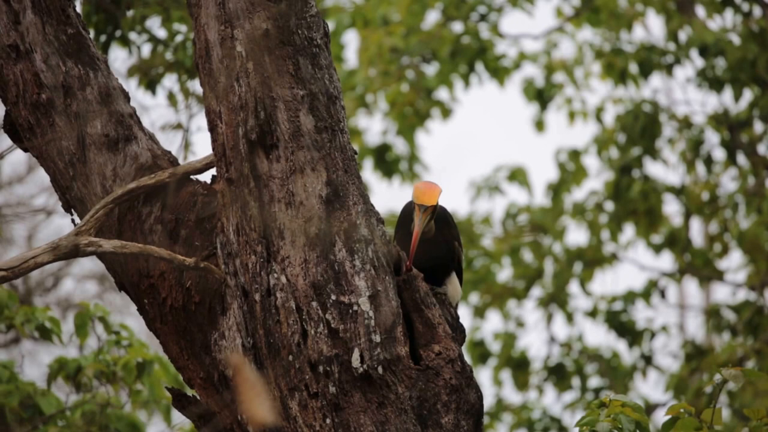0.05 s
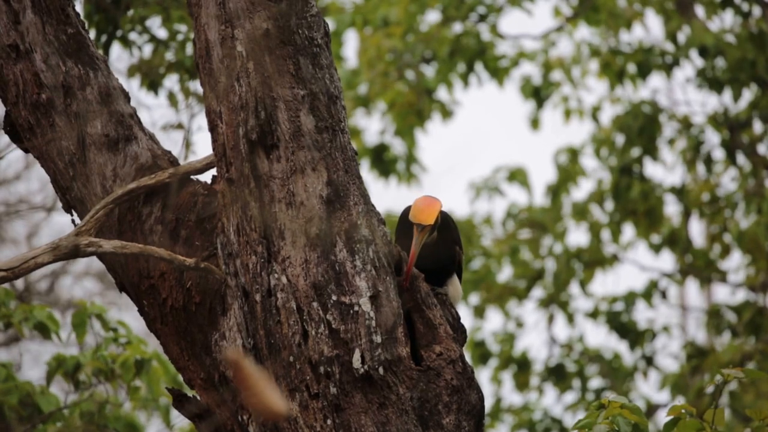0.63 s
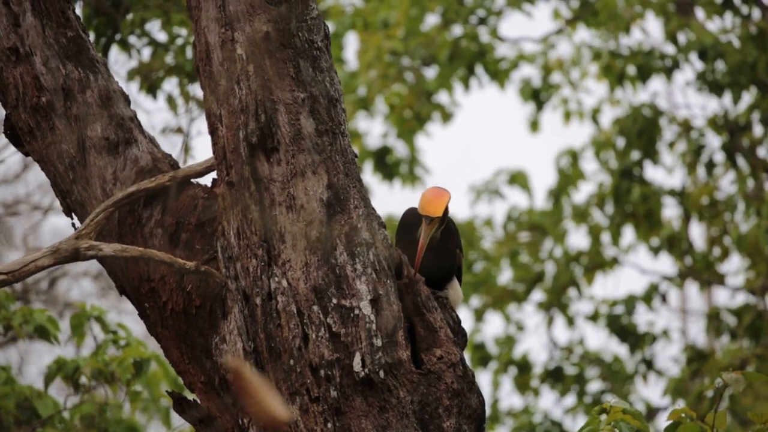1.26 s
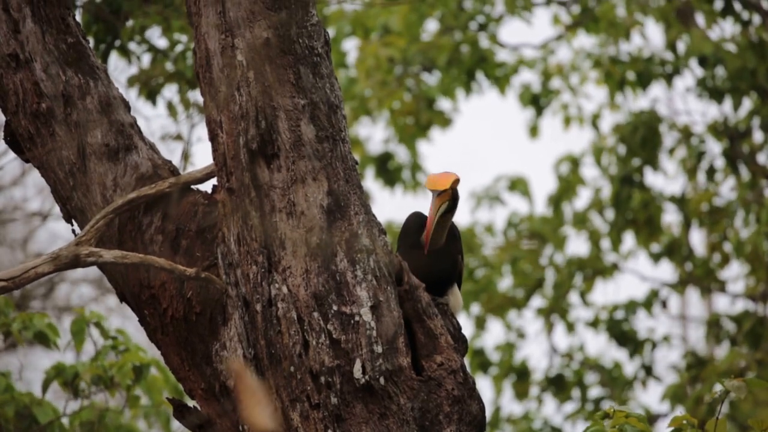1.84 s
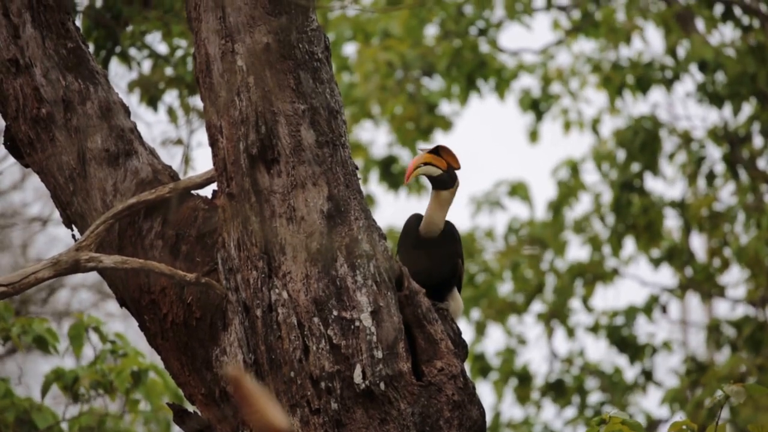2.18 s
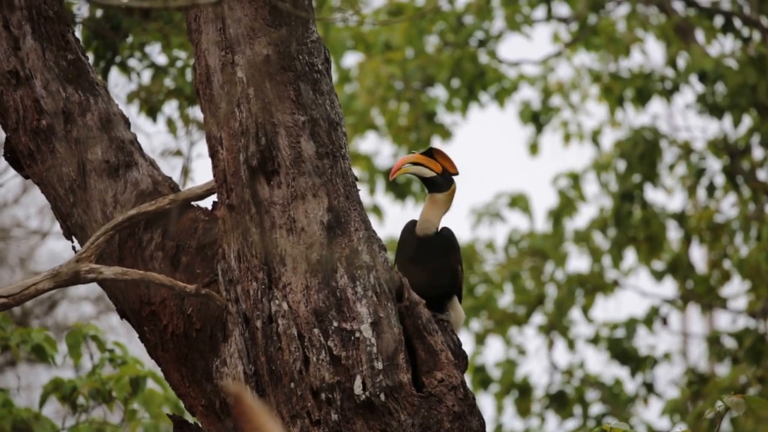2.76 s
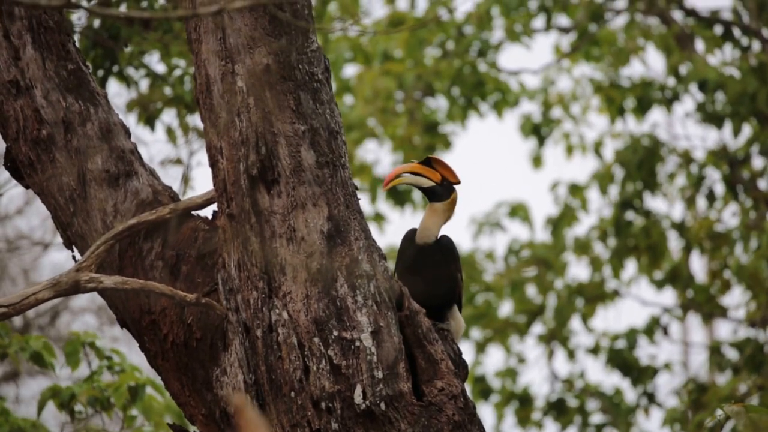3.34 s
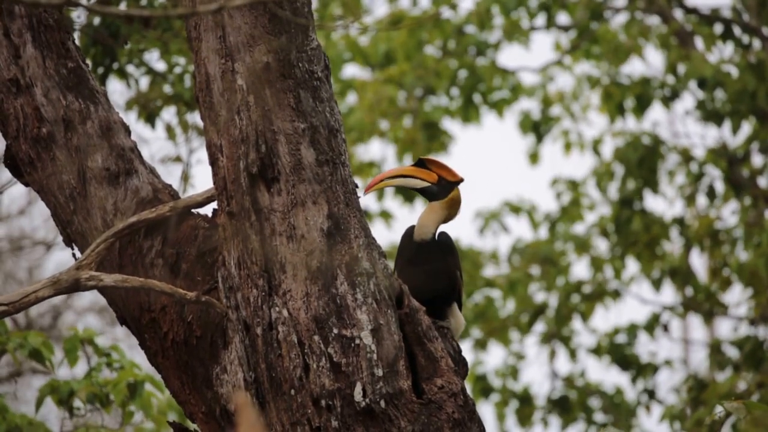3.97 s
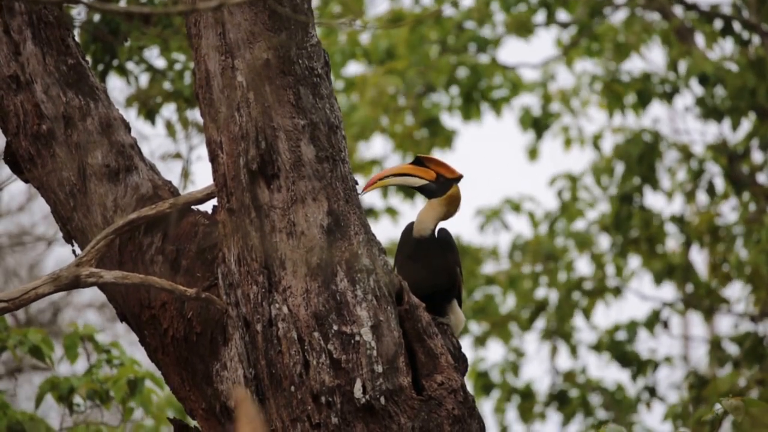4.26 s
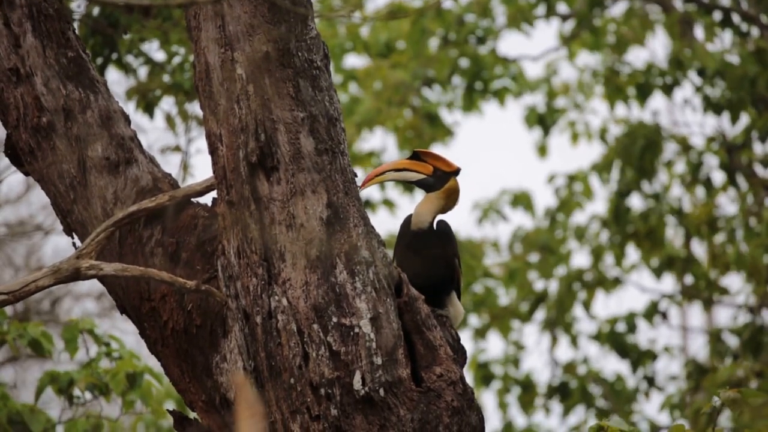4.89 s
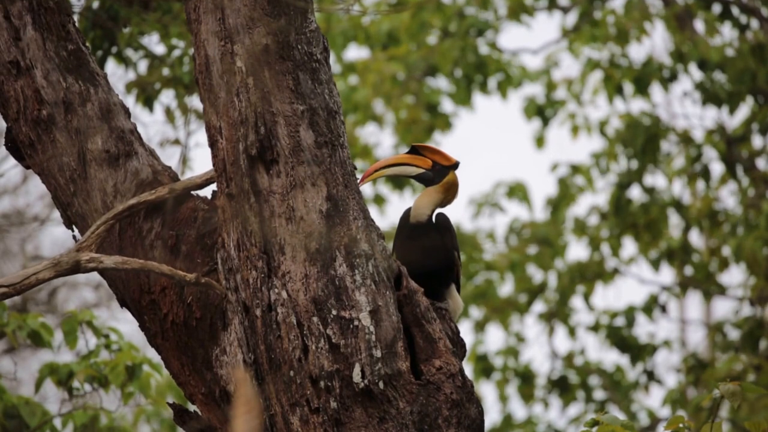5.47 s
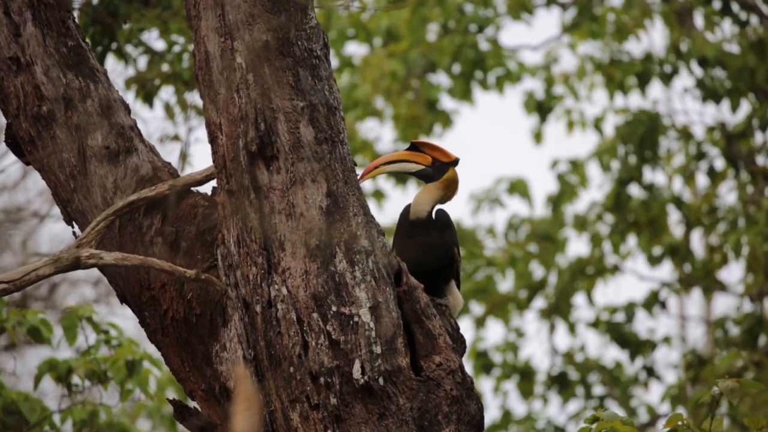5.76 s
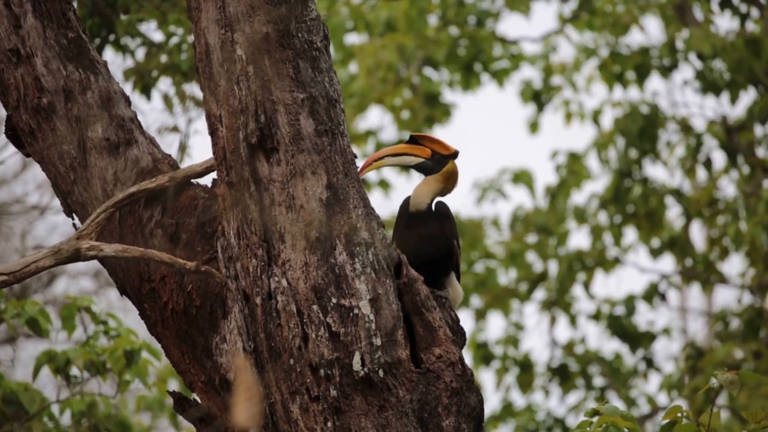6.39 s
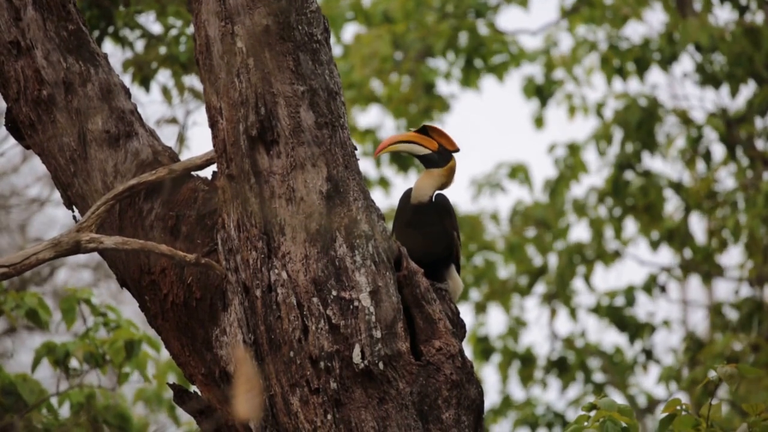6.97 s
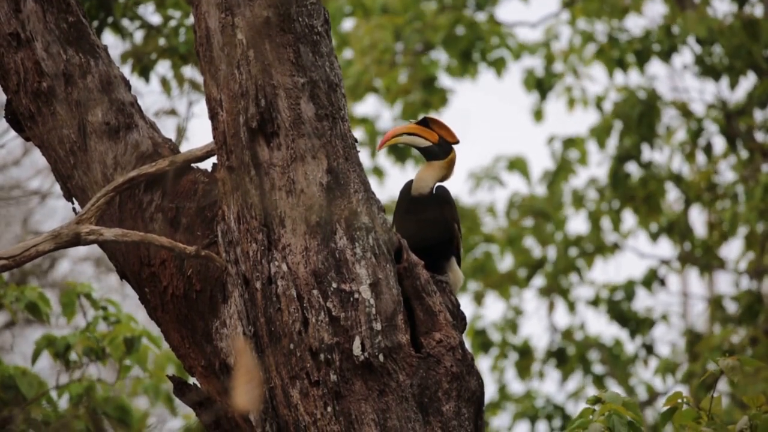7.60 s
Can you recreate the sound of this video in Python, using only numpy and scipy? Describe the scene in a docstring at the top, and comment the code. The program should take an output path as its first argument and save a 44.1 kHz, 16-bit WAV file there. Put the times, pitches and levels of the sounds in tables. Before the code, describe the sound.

A small bird repeats a thin, high whistle over rustling forest leaves, while wind buffets the microphone and then drops away.

```python
"""A forest, where the canopy rushes and hisses as steady broadband noise under a faint band of insects.
Far bird notes arrive as nearly all echo, leaves brush, and a few twigs tick with a damped resonance.
Turbulent wind buffets the microphone for the first four seconds, then drops. A small bird repeats one
thin, high whistle, a pure tone that dips and climbs again; trunks and leaves scatter it."""
import sys
import numpy as np
from scipy import signal
from scipy.fft import rfft, irfft, next_fast_len
from scipy.io import wavfile
from scipy.ndimage import map_coordinates

SR = 44100
rng = np.random.default_rng(int(sys.argv[2]) if len(sys.argv) > 2 else 0)


def unload_audio(sound):
    """Save the sound as a 16-bit wav file, at the path given as the first command line argument."""
    columns = np.transpose(np.atleast_2d(sound))
    # keep every value between -1 and 1, then stretch to whole-number steps
    steps = np.round(np.clip(columns, -1, 1) * 32767)
    wavfile.write(sys.argv[1], SR, steps.astype(np.int16))


N = 336483


def amp(db):
    """Decibels to amplitude ratio."""
    return 10 ** (np.asarray(db) / 20)


def unit(x):
    """Normalisation to rms 1."""
    return x / np.sqrt(np.mean(x ** 2) + 1e-20)


def along(points, hz):
    """Interpolation of (frequency_hz, value) points on a log frequency axis."""
    f, v = np.transpose(points)
    return np.interp(np.log(hz + 1), np.log(f + 1), v)


def curves(rows):
    """Linear interpolation in time: one value per sample for each column after the first."""
    times, *columns = np.transpose(rows)
    return [np.interp(np.arange(N) / SR, times, column) for column in columns]


def wobble(rate, size=N):
    """Smooth random modulation: a spline through rate knots a second."""
    knots = rng.standard_normal(int(size * rate / SR) + 4)
    return map_coordinates(knots, [np.arange(size) * rate / SR])


def filtered(x, response):
    """Linear filtering: the spectrum of x times a frequency response."""
    size = next_fast_len(len(x) + SR // 4)
    return irfft(rfft(x, size) * response(np.fft.rfftfreq(size, 1 / SR)), size)[:len(x)]


def noise(spectrum):
    """White noise coloured by (frequency_hz, gain_db) points, at rms 1."""
    return unit(filtered(rng.standard_normal(N), lambda hz: amp(along(spectrum, hz))))


def add(track, start_s, sound):
    """Superposition of a sound on the track."""
    part = track[max(round(start_s * SR), 0):][:len(sound)]
    part += sound[:len(part)]


# Drift of the canopy, before each layer's gain: time_s, rush_db, leaves_db
CANOPY_LEVELS = [(0.0, -51.5, -55), (1.4, -52.5, -55), (2.72, -51, -53.5), (4.68, -50.5, -53.5),
                 (6.16, -49.5, -53), (7.63, -50, -52)]
# Spectra of far trees and of near leaves: frequency_hz, gain_db
RUSH_SPECTRUM = [(25, 2), (50, 0.5), (80, -6), (150, 3), (350, 3), (500, 2), (800, 0), (1300, -5),
                 (2200, -12.5), (4000, -24), (9000, -48)]
LEAF_SPECTRUM = [(400, -16), (1200, 5), (2200, 5), (3500, 3.5), (4800, 1), (6500, -5.5), (8200, -5.5),
                 (10000, -9.5), (12500, -13), (15700, -17)]

def canopy(rush_gain_db=5, leaves_gain_db=3):
    """Broadband noise with a slowly drifting level: far trees rush and near leaves hiss."""
    rush_db, leaves_db = curves(CANOPY_LEVELS)
    rush = amp(rush_db + rush_gain_db + 0.25 * wobble(8)) * noise(RUSH_SPECTRUM)
    leaves = amp(leaves_db + leaves_gain_db + 0.24 * wobble(9)) * noise(LEAF_SPECTRUM)
    return rush + leaves


# Spectrum of the insects: frequency_hz, gain_db
INSECT_SPECTRUM = [(4500, -15.5), (5800, -6.5), (6500, -1), (7100, -6), (8200, -15.5), (10000, -28)]

def insects(level_db=-60):
    """Band-limited noise: insects merge into one thin, steady band."""
    return amp(level_db + 0.36 * wobble(3.5)) * noise(INSECT_SPECTRUM)


# Reverberation time of the forest: frequency_hz, t60_s
FOREST_DECAY = [(500, 1), (3000, 1), (8000, 0.82), (14000, 0.72)]
# What the foliage throws back: frequency_hz, gain_db
FOLIAGE_REFLECTION = [(500, 0), (5000, 5), (6400, -5.5), (7200, -3), (7900, -4.5), (9000, -13), (14000, -7)]

def through_trees(x, near_db, near_t60, far_db, perch_db=-3, perch_t60=0.098):
    """Multipath scattering: direct sound, leaves at the source, near trunks and the forest's long tail."""
    t = np.arange(SR) / SR
    perch = rng.standard_normal(SR) * amp(-60 * t / perch_t60)
    near = rng.standard_normal(SR) * amp(-60 * t / near_t60)
    hz, frame_s, spectra = signal.stft(rng.standard_normal(SR), SR, nperseg=256)
    decay = amp(-60 * frame_s / along(FOREST_DECAY, hz)[:, None])
    far = signal.istft(spectra * decay, SR, nperseg=256)[1][:SR]
    tails = [(perch_db, perch), (near_db, near), (far_db, far)]
    echoes = sum(amp(db) * tail / np.linalg.norm(tail) for db, tail in tails)
    paths = filtered(echoes, lambda f: amp(along(FOLIAGE_REFLECTION, f)))
    paths[0] += 1  # the direct path
    return signal.fftconvolve(x, paths / np.sqrt(1 + np.sum(echoes ** 2)))


# Distant notes, before scattering: start_s, level_db, pitch_hz, length_s
FAR_BIRD_NOTES = [(0.976, -57, 1815, 0.078), (1.789, -60, 3400, 0.0536)]

def far_birds(fall=0.061):
    """Short falling notes from so far away that the reverberant field outweighs the direct sound."""
    out = np.zeros(N)
    for start_s, level_db, pitch_hz, length_s in FAR_BIRD_NOTES:
        progress = np.linspace(0, 1, int(length_s * SR))
        hz = pitch_hz * (1 + fall * (1 - 2 * progress) + 0.079 * wobble(196, size=len(progress)))
        note = np.sin(np.pi * progress) * np.sin(2 * np.pi * np.cumsum(hz) / SR)
        add(out, start_s, through_trees(amp(level_db) * unit(note), near_db=14, near_t60=0.33, far_db=15))
    return out


# Leaves brushing together: start_s, length_s, level_db
LEAF_BRUSHES = [(3.077, 0.1, -50), (3.31, 0.16, -49.5)]
# Their spectrum: frequency_hz, gain_db
BRUSH_SPECTRUM = [(600, -10), (1500, 7), (4200, -1), (6500, -10), (14000, -24)]

def rustles(flutter_db=2.9):
    """Friction noise of brushing leaves, swelling and fading."""
    swell = np.zeros(N)
    for start_s, length_s, level_db in LEAF_BRUSHES:
        add(swell, start_s, amp(level_db) * np.hanning(int(length_s * SR)))
    return swell * amp(flutter_db * wobble(80)) * noise(BRUSH_SPECTRUM)


# Twig ticks, before scattering: start_s, level_db, pitch_hz
TWIG_TICKS = [(0.096, -40, 4700), (2.535, -45, 9500), (2.766, -30, 2740), (3.128, -46, 8600),
              (3.138, -43, 4000)]

def twigs(t60_s=0.012, q=2.1):
    """Damped resonance: a brief crack coloured by one broad mode of the wood, scattered by trunks."""
    out = np.zeros(N)
    t = np.arange(SR // 20) / SR
    for start_s, level_db, pitch_hz in TWIG_TICKS:
        def wood(hz):
            """A band-pass resonance with a treble roll-off."""
            ratio = hz / pitch_hz
            damping = 1j * ratio / q
            return damping / (1 - ratio ** 2 + damping) / (1 + (ratio / 2) ** 2)
        crack = unit(filtered(rng.standard_normal(len(t)), wood)) * amp(-60 * t / t60_s)
        add(out, start_s, through_trees(amp(level_db) * crack, near_db=-6, near_t60=0.13, far_db=-3))
    return out


# Light air between gusts, which drops away: time_s, strength_db
BREEZE_STRENGTH = [(0, -28.5), (2.1, -32.5), (3.8, -40), (3.87, -53), (7.63, -55.5)]
# Gusts on the microphone: start_s, length_s, strength_db
WIND_GUSTS = [(-.03, 0.65, -24.5), (0.636, 0.31, -28), (1.05, 0.377, -24.5), (1.552, 0.065, -27.5),
              (1.818, 0.24, -28), (2.22, .23, -29), (2.583, 0.37, -27), (2.997, 0.31, -27),
              (3.548, .25, -29), (3.947, .33, -48.5), (4.616, 0.13, -46), (4.9, 0.59, -47.5)]

def wind_strength(attack_s=0.02, release_s=0.042, sag_db_per_s=1.5):
    """Addition of powers, returned in dB: the breeze plus gusts that arrive fast, sag and let go."""
    t = np.arange(N) / SR
    power = amp(curves(BREEZE_STRENGTH)[0]) ** 2
    for start_s, length_s, strength_db in WIND_GUSTS:
        age_s = t - start_s
        envelope = np.clip(age_s / attack_s, 0, 1) * np.clip(1 - (age_s - length_s) / release_s, 0, 1)
        sag_db = sag_db_per_s * np.clip(age_s, 0, length_s)
        power += (envelope * amp(strength_db - sag_db)) ** 2
    return 10 * np.log10(power)


# Spectrum of the buffeting: frequency_hz, gain_db
RUMBLE_SPECTRUM = [(20, -6), (35, -9), (55, 2), (90, 3.5), (130, 2.5), (190, -6.5), (250, -16),
                   (320, -28.5), (420, -30), (700, -63.5)]

def wind(deep_db=-47, rumble_gain_db=-3.5, tear_db=-43, tear_growth=2.18, lump_db=2.5, spike_db=2.0):
    """Turbulence on the microphone: light air stays deep, more wind rumbles, the strongest tears."""
    force = amp(wind_strength() + lump_db * wobble(35))
    deep_noise = noise([(20, -34), (40, 0), (60, -9), (90, -7.5), (160, -33), (400, -66)])
    deep = amp(deep_db) * unit(np.sqrt(force) * deep_noise)
    rumble = amp(rumble_gain_db) * force * noise(RUMBLE_SPECTRUM)
    flaps = force ** tear_growth * amp(spike_db * wobble(70))  # a steep law favours the strongest swirls
    tear_noise = noise([(100, -21), (200, 8), (260, 3), (340, -6.5), (520, -17), (900, -41), (2500, -67)])
    tear = amp(tear_db) * unit(flaps * tear_noise)
    return deep + rumble + tear


# Single eddies that hit the microphone: centre_s, peak_db, pitch_hz
EDDY_HITS = [(.03, -15.5, 153), (0.267, -11.5, 131), (0.426, -16.5, 297), (0.482, -17, 128),
             (0.712, -14, 217), (1.165, -18.5, 218), (1.599, -16, 116), (1.85, -16, 164), (2.008, -22, 240),
             (2.407, -10, 129), (2.425, -16, 175), (3.111, -9.5, 140), (3.174, -19.5, 240),
             (3.598, -16, 101), (4.738, -37, 75), (6.385, -35, 69), (6.97, -31, 83)]

def eddies(width_cycles=0.36):
    """Pressure pulses: each eddy pushes and pulls once on the microphone; smaller ones pass faster."""
    out = np.zeros(N)
    t = np.arange(-SR // 20, SR // 20) / SR
    for centre_s, peak_db, pitch_hz in EDDY_HITS:
        swing = np.sin(2 * np.pi * pitch_hz * t + rng.uniform(0, 2 * np.pi))
        envelope = np.exp(-0.5 * (t * pitch_hz / width_cycles) ** 2)
        add(out, centre_s + t[0], amp(peak_db) * swing * envelope)
    return out


def glide(progress, dip_hz, end_hz, start_hz=5500, crest_hz=7200, climb_bend=1.25):
    """Frequency modulation: a flick to the crest, an even sink, a quickening climb to the held end."""
    crest_at, dip_at, end_at = 0.06, 0.42, 0.91  # shares of the whistle's length
    ramp = lambda a, b: np.clip((progress - a) / (b - a), 0, 1)
    flick = (start_hz - crest_hz) * (1 - ramp(0, crest_at)) ** 2
    sink = (crest_hz - dip_hz) * (1 - ramp(crest_at, dip_at))
    climb = (end_hz - dip_hz) * ramp(dip_at, end_at) ** climb_bend
    return dip_hz + flick + sink + climb


# Resonance of the bird's throat: frequency_hz, gain_db
THROAT_RESPONSE = [(5000, -16), (5600, -11), (6000, -4), (6400, 1), (6800, -.5), (7200, -3.5), (7500, -5),
                   (7900, -4)]

def whistle(level_db, length_s, dip_hz, end_hz, waver=0.0083, flutter_db=2.0):
    """Source and filter: a gliding pure tone, loudest where it crosses the throat's resonance."""
    attack_s, release_s = 0.0066, 0.0087
    t = np.arange(int(length_s * SR)) / SR
    hz = glide(t / length_s, dip_hz, end_hz) * (1 + waver * wobble(158, size=len(t)))
    rms = amp(level_db + along(THROAT_RESPONSE, hz) + flutter_db * wobble(126.4, size=len(t)))
    envelope = np.clip(t / attack_s, 0, 1) * np.clip((length_s - t) / release_s, 0, 1)
    return np.sqrt(2) * rms * envelope * np.sin(2 * np.pi * np.cumsum(hz) / SR)


# Whistles, before the throat and the trees: start_s, level_db, length_s, dip_hz, end_hz
WHISTLES = [(.494, -35.5, .192, 5420, 7780), (2.166, -36.3, .204, 5150, 7680),
            (4.090, -33.3, .202, 5230, 7860), (6.010, -34.3, .214, 4950, 8030),
            (7.583, -34, .202, 5230, 7860)]

def small_bird():
    """A tonal source among scatterers: one whistle about every two seconds, never quite alike."""
    out = np.zeros(N)
    for start_s, level_db, length_s, dip_hz, end_hz in WHISTLES:
        call = whistle(level_db, length_s, dip_hz, end_hz)
        add(out, start_s, through_trees(call, near_db=4, near_t60=0.32, far_db=0))
    return out


def scene():
    """Superposition of all sources at one microphone."""
    return (canopy() + insects() + far_birds() + rustles() + twigs() + wind() + eddies() + small_bird())[None]


def record(dry, low_cut_hz=32, top_hz=15720):
    """Band limiting: the microphone loses the deepest bass, and the camera keeps nothing above top_hz."""
    response = lambda hz: hz ** 2 / np.hypot(hz ** 2, low_cut_hz ** 2) * (hz < top_hz)
    return np.array([filtered(channel, response) for channel in dry])


dry = scene()
out = record(dry)
unload_audio(out)
```